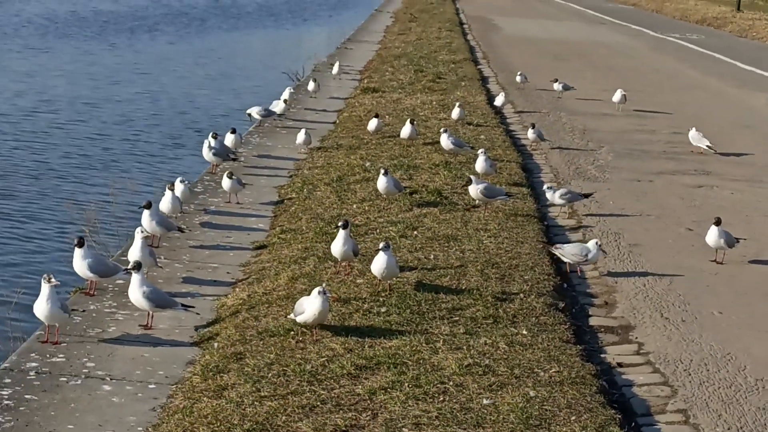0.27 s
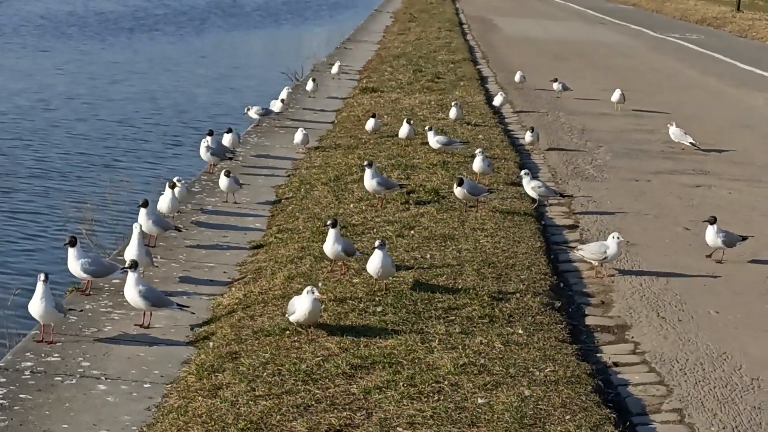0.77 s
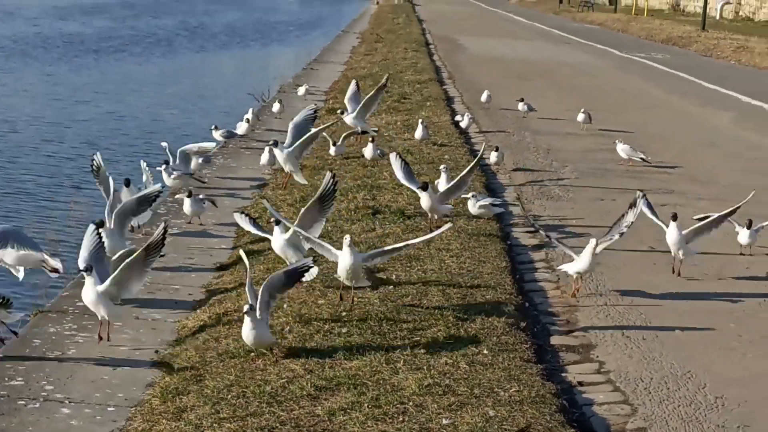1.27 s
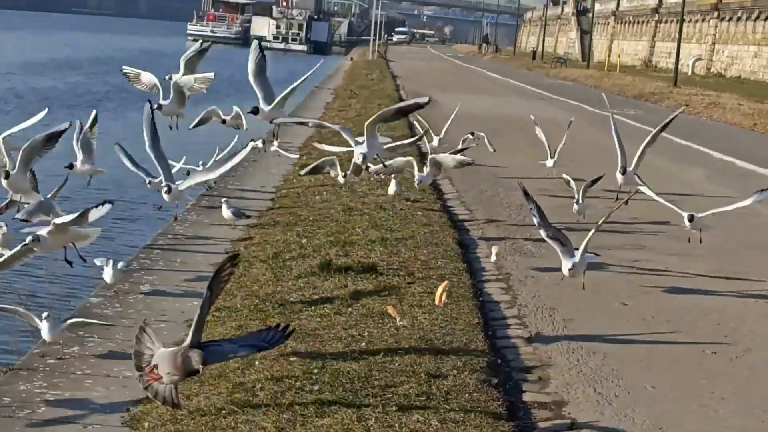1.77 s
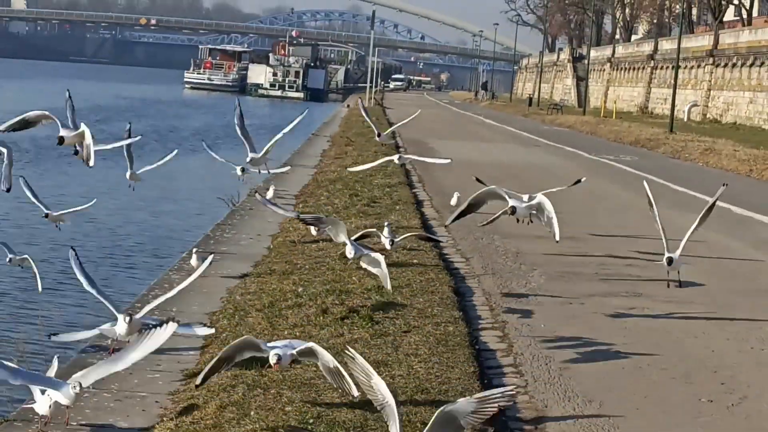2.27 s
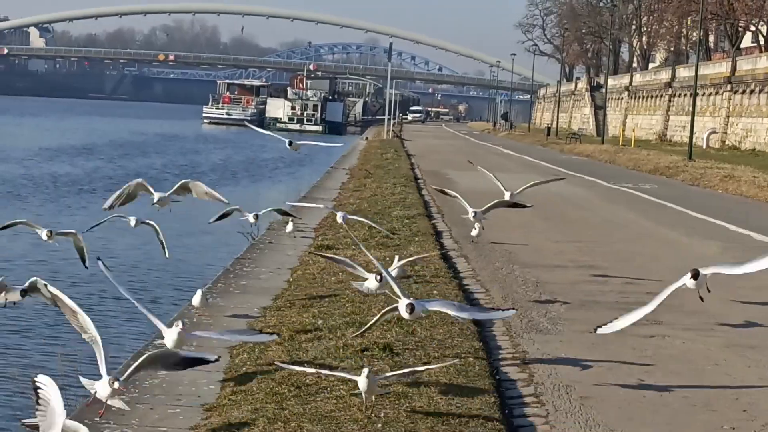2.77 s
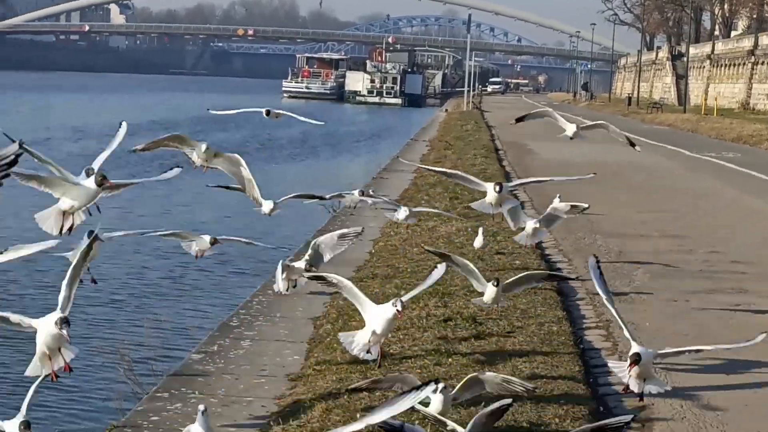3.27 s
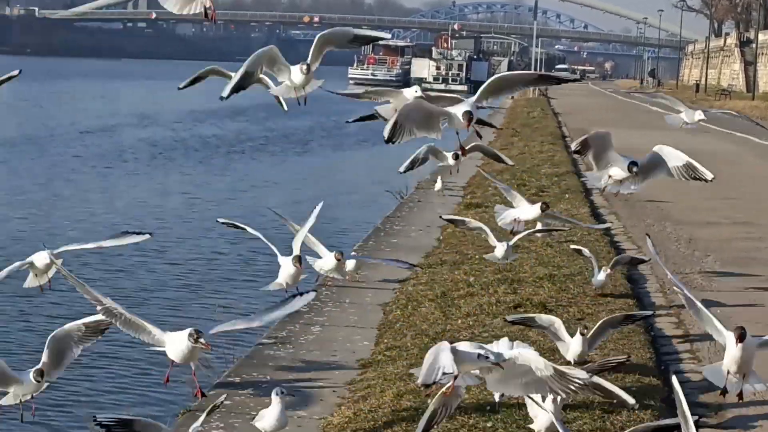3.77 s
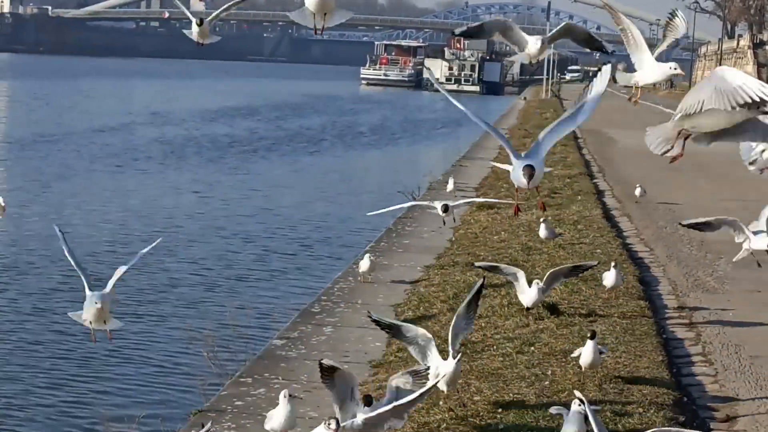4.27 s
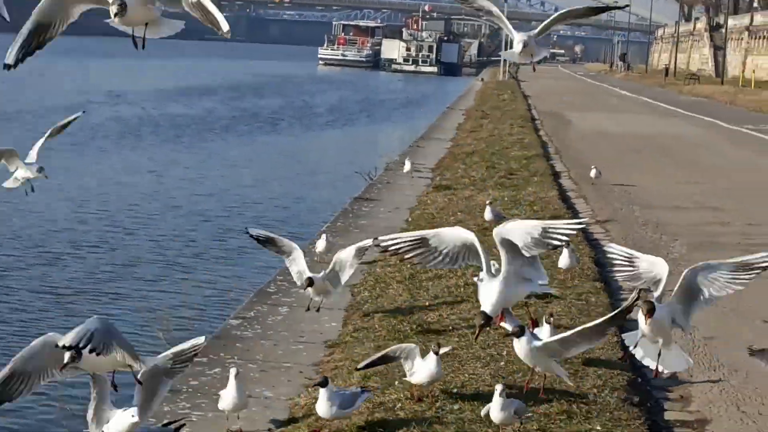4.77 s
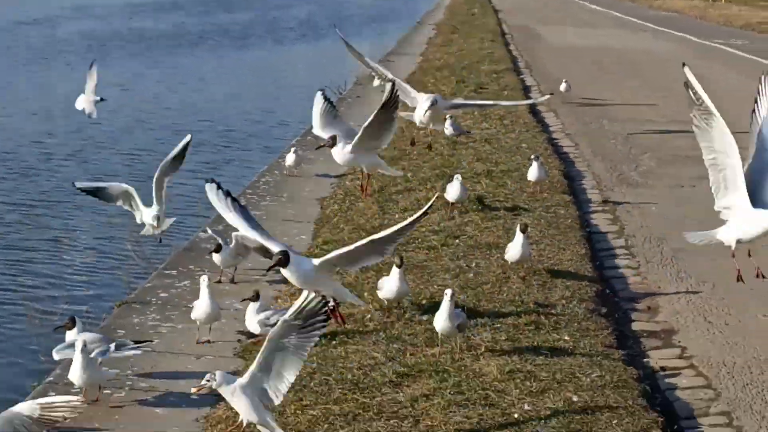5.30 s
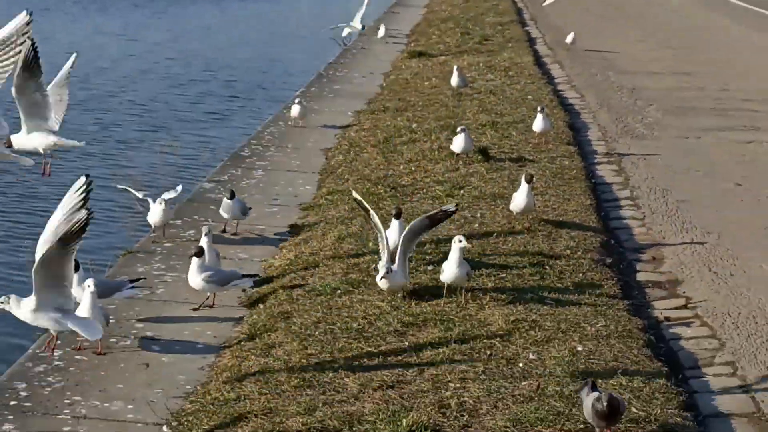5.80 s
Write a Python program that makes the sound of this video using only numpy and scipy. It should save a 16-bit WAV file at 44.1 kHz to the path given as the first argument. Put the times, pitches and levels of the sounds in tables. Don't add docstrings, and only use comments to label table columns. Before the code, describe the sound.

An open riverside path with faint far traffic hum and a soft wing thump. At about one and a half seconds a flock of gulls takes off: low flutters, then hoarse, nasal, rattling squawks overlapping, mostly to the left. The squabble stays dense for over two seconds, thins to a few single squawks, then falls back to quiet. Handheld phone, stereo, calls fairly close with a short outdoor scatter.

```python
import sys
import numpy as np
from scipy import signal
from scipy.fft import rfft, irfft, next_fast_len
from scipy.io import wavfile
from scipy.ndimage import uniform_filter1d, map_coordinates

SR = 44100
rng = np.random.default_rng(int(sys.argv[2]) if len(sys.argv) > 2 else 0)


def ratio_of_db(decibels):
    return 10 ** (np.asarray(decibels, float) / 20)


def dump_mix(stems):
    frames = np.atleast_2d(stems).T
    limited = np.clip(frames, -1, 1)
    pcm = np.round(limited * 32767).astype(np.int16)
    wavfile.write(sys.argv[1], SR, pcm)


N = 266364


def flock():
    # peak time, rise and fall in seconds, peak level in dB,
    # peak pitch in Hz.
    hoarse_bird = [
        (2.09, .06, .035, -19, 852),
        (2.14, 0.032, 0.043, -24.5, 876),
        (2.186, 0.035, 0.048, -19, 875),
        (2.243, 0.044, 0.028, -24.5, 859),
        (3.198, 0.019, 0.043, -32.5, 830),
    ]
    raspy_bird = [
        (1.712, 0.048, 0.052, -25.5, 1000),
        (1.964, 0.051, 0.028, -26, 1002),
        (3.76, 0.04, 0.053, -33, 870),
        (3.843, 0.053, 0.056, -22.5, 1010),
        (2.535, .04, .04, -24.5, 1020),
        (2.028, .012, 0.024, -34.5, 1020),
        (3.225, 0.033, .03, -34.5, 830),
        (4.326, .025, 0.0347, -37.5, 1050),
        (4.295, 0.038, 0.02, -37, 882),
    ]
    shrill_bird = [
        (3.27, .038, 0.067, -20.5, 989),
        (3.468, .038, 0.039, -17.5, 1020),
        (3.551, 0.046, 0.039, -29.5, 1039),
        (3.592, 0.026, 0.025, -23.5, 1284),
        (3.902, .04, .035, -25.5, 1078),
        (3.952, 0.044, 0.033, -20.5, 1075),
        (4.028, 0.04, 0.051, -20.5, 1090),
    ]
    rattling_bird = [
        (3.139, 0.045, 0.042, -27.5, 991),
        (3.375, 0.049, 0.047, -21.5, 1025),
        (3.686, .05, 0.047, -20, 1132),
        (4.197, 0.055, 0.045, -22.5, 1076),
    ]
    distant_bird = [
        (3.085, 0.038, .04, -40, 1100),
        (3.63, .03, .03, -42, 875),
        (4.1, .05, 0.057, -40, 1050),
        (4.255, 0.031, .03, -44.5, 948),
        (4.675, .035, 0.023, -39, 927),
        (4.994, 0.058, 0.022, -46, 970),
        (5.76, .02, 0.028, -47, 1206),
    ]
    low_bird = [
        (4.845, .036, 0.043, -23, 890),
        (4.5, 0.056, 0.048, -38, 520),
        (5.145, 0.041, 0.038, -51.5, 880),
    ]
    throaty_bird = [
        (4.516, 0.043, 0.044, -23, 979),
        (4.565, 0.041, 0.033, -31, 902),
        (5.205, .03, .025, -50, 854),
    ]
    # time in seconds, level in dB, pitch in Hz.
    cries = [
        [(2.31, -49, 935), (2.338, -26.5, 948), (2.36, -21.5, 1052), (2.395, -20.5, 1174), (2.45, -19, 1167),
         (2.49, -18, 1241), (2.52, -23.5, 1193), (2.56, -35, 1055)],
        [(2.55, -40, 901), (2.6, -34, 828), (2.66, -31, 867), (2.7, -34, 874), (2.74, -29.5, 1145),
         (2.774, -41, 917), (2.79, -68, 820)],
        [(2.825, -47, 834), (2.85, -32, 900), (2.9, -30, 1082), (2.925, -24, 1172), (2.96, -27.5, 1146),
         (2.985, -32, 1022), (3.038, -34, 942), (3.06, -58, 890)],
        [(1.68, -53, 951.6), (1.72, -36, 1023), (1.78, -37, 960), (1.86, -33.5, 932), (1.92, -41, 863.5),
         (2.03, -31.5, 1039), (2.2, -34.5, 908), (2.29, -43.5, 864)],
        [(1.69, -61, 1104), (1.73, -39, 1067), (1.8, -37.5, 1132), (1.86, -38, 1090), (1.91, -38, 1060),
         (2.0, -38, 920), (2.05, -60, 880)],
    ]
    asides = [
        [(1.628, -51, 714), (1.64, -43, 782), (1.65, -39.5, 812), (1.66, -41, 755), (1.668, -41, 706)],
        [(5.455, -53, 845), (5.482, -41.5, 881), (5.5, -36, 936), (5.535, -35.5, 956), (5.555, -37, 832),
         (5.6, -38, 865), (5.645, -40.5, 834), (5.665, -48.5, 824), (5.71, -54.5, 800)],
        [(1.395, -52.5, 903), (1.438, -38, 933), (1.468, -33.5, 942), (1.482, -49, 934)],
    ]
    # rattle in Hz, left-right difference in dB, beak resonance in Hz at 1 kHz pitch,
    # low band in dB, bright band in dB.
    voices = [(68, 9.5, 2700, -17, -13), (70.07, 9, 3130, -7, -12.5), (69.9, 9.5, 3310, -12, -16),
              (74.2, 8.5, 3470, -7, -11.5), (69.9, 11, 3160, -5, -7.5), (72.1, 8, 3660, -6.5, -16.5),
              (72.5, 8, 3300, -3.5, -16), (65.2, 8.5, 3150, -17, -7.5), (72.8, 9, 3400, -8, -10.5),
              (66.4, 10, 3240, -9.5, -9), (62.23, 1.5, 3000, 0.5, -14), (59.7, -3, 2200, -31, -0.9),
              (60, 11, 3000, -7, -18), (67.7, 5.5, 3520, -3, -14.5), (69.45, 8, 2800, -12, -23)]
    grain = [(.8, .45), (.85, .57), (.57, .78), (.58, .82), (.65, .6), (.55, .9), (.55, .85), (.55, .98),
             (.85, .7), (.6, .85), (.42, .75), (.52, .95), (.15, 0), (.45, .65), (.85, .5)]
    breath = [-1.5, 0, 1.5, 3, -1.5, 2.5, 2, 8, 4.5, 6, -4, 8.5, -2, -12, -6.5]
    beak_per_hz = 0.97
    port_lag = 2

    squawkers = (hoarse_bird, raspy_bird, shrill_bird, rattling_bird, distant_bird, low_bird, throaty_bird)
    birds = [[shaped(*row) for row in bird] for bird in squawkers]
    birds += [[cry] for cry in cries + asides]
    out = np.zeros((2, N))
    for calls, texture, breath_db, voice in zip(birds, grain, breath, voices):
        rattle_hz, lean_db, beak_hz, *bands_db = voice
        for rows in calls:
            rise_hz = beak_per_hz * (np.max(rows, axis=0)[2] - 1000)
            call = squawk(rows, *texture, rattle_hz, beak_hz + rise_hz, *bands_db, breath_db)
            direct = panned(call, lean_db)
            direct[1] = np.roll(direct[1], rng.integers(-port_lag, port_lag))
            heard = panned(bank(call), 0.72 * lean_db)
            add(heard, direct, 0)
            level = np.linalg.norm(call) / np.linalg.norm(heard.mean(axis=0))
            add(out, heard * level, rows[0][0])
    # (Hz, dB).
    far_port = [(800, 5.5), (2700, -2), (4500, -2), (6400, 16.0), (7800, 8), (9500, -10)]
    return filtered(out, lambda hz: [hz ** 0, ratio_of_db(along(far_port, hz))])


def shaped(peak_s, rise_s, fall_s, peak_db, peak_hz):
    edge_db, roundness = 18, 1.72
    slack_hz, slack_share, bend = 800, .85, 1.8
    u = np.linspace(-1, 1, 13)
    s = peak_s + u * np.where(u < 0, abs(rise_s), abs(fall_s))
    sag_hz = slack_share * (peak_hz - min(slack_hz, peak_hz)) * abs(u) ** bend
    return np.transpose([s, peak_db - edge_db * abs(u) ** roundness, peak_hz - sag_hz])


def squawk(rows, hoarse, depth, rattle_hz, beak_hz, low_db, bright_db, breath_db):
    # frequency in Hz, gain in dB.
    throat = [(260, -43), (450, -3.5), (633, -1), (815, -14.5), (931, -16), (1370, 4), (1930, 7.5),
              (3140, -0.5), (3810, -4.5), (4690, -13), (5360, -25), (6040, -29), (8010, -42.5),
              (12100, -31.5), (15600, -40)]
    s, *cols = np.transpose(rows)
    t = np.arange(s[0], s[-1] + 0.0016, 1 / SR)
    level_db, pitch_hz = (np.interp(t, s, c) for c in cols)

    slack = np.clip((level_db.max() - level_db) / 14, 0, 1)
    hoarse = hoarse * (.75 + .5 * slack)
    low_db = np.minimum(low_db, -.4) * (1 - 0.7 * slack)

    beats = np.cumsum(rattle_hz * (1 + .08 * wobble(len(t), 40))) / SR
    beats = beats - beats[level_db.argmax()] + 40.4
    beat = beats % 1
    chance = rng.standard_normal((80, 3))[beats.astype(int)].T
    opening = np.clip(beat / .2, 0, 1)
    closing = np.clip((.92 - beat) / .18, 0, 1)
    puff = opening * (1 - .15 * beat) * closing
    gate = (1 - depth + depth * puff ** 1.5) * ratio_of_db(2.2 * depth * wobble(len(t), 130))

    arch = .07 * depth * (np.sin(np.pi * beat) - .7)
    jitter = hoarse * (.07 * wobble(len(t), 600) + .04 * wobble(len(t), 120) + .04 * chance[0])
    k = np.arange(1, 13)[:, None]
    membrane = lambda hz: np.cos(k * 2 * np.pi * np.cumsum(hz) / SR + 0.303 * k * k).sum(axis=0)
    first = membrane(pitch_hz * (1 + arch + jitter))
    second = membrane(pitch_hz * (.87 + .05 * chance[1] + arch - jitter))
    breath = rng.standard_normal(len(t))
    source = unit(first) + 1.5 * hoarse ** 2 * (1 + .4 * chance[2]) * unit(second)
    source = source + 1.2 * hoarse ** 2 * breath
    source = source / np.sqrt(1 + 4 * hoarse ** 4)

    span_hz = np.ptp(pitch_hz) + 1
    edge = lambda hz, at_hz: 1 / (1 + (hz / at_hz) ** 14)
    peak = lambda hz, at_hz, width_hz: 1 / (1 + ((hz - at_hz) / width_hz) ** 2)
    beak = lambda hz, at_hz: (edge(hz, 4020) - edge(hz, 2407)) * (0.21 + peak(hz, at_hz, 450))
    hiss = lambda hz: (1 - edge(hz, 7950.0)) * (1 + 0.62 * peak(hz, 12200, 1200))
    zones = lambda hz: ratio_of_db(along(throat, hz)) * [
        edge(hz, 2460), beak(hz, beak_hz), beak(hz, beak_hz - 0.85 * span_hz),
        edge(hz, 8300) - edge(hz, 4207), hiss(hz)]
    low, wide, narrow, bright, air = (unit(zone) for zone in filtered(unit(gate) * source, zones))

    gape = np.pi / 2 * (pitch_hz - pitch_hz.min()) / span_hz
    middle = unit(np.sin(gape) ** 2 * wide + np.cos(gape) ** 2 * narrow)
    rest = np.sqrt(np.clip(1 - ratio_of_db(2 * low_db) - ratio_of_db(2 * bright_db), .03, 1))
    air_db = breath_db - 33.0 - 0.32 * level_db.max()
    voice = ratio_of_db(low_db) * low + rest * middle + ratio_of_db(bright_db) * bright + ratio_of_db(air_db) * air
    ends = np.clip(np.minimum((t - t[0]) / 0.0092, (t[-1] - t) / 0.0022), 0, 1)
    return ratio_of_db(level_db) * ends * voice


def bank(x):
    # frequency in Hz, 60 dB decay time in seconds.
    decay = [(300, 0.11), (2500, 0.21), (6000, 0.16), (14000, 0.012)]
    hz, t, z = signal.stft(rng.standard_normal((2, SR // 8)), SR, nperseg=256)
    tail = signal.istft(z * ratio_of_db(-60 * t / along(decay, hz)[:, None]), SR, nperseg=256)[1]
    near = rng.standard_normal(tail.shape) * ratio_of_db(-60 * np.arange(tail.shape[1]) / SR / .007)
    answer = ratio_of_db(-4) * unit(near) + ratio_of_db(-17) * unit(tail)
    return signal.fftconvolve(x[None], answer / np.sqrt(tail.shape[1]), axes=1)


def wing_thumps():
    # time in seconds, peak level in dB, frequency in Hz.
    flaps = [(0.303, -26.5, 118), (1.6, -26.5, 121), (1.63, -27, 198), (1.719, -27, 148), (1.744, -30, 188),
             (1.768, -37, 137), (1.791, -33, 177), (1.818, -28, 105), (1.872, -26.5, 159),
             (1.941, -30, 143), (1.99, -34.5, 144), (2.081, -30, 129), (3.891, -30.5, 92.5)]
    out = np.zeros((2, N))
    t = np.arange(0, .04, 1 / SR)
    for s, db, hz in flaps:
        phase = rng.normal(0, 1.1, (2, 1))
        thump = np.sin(np.pi * t / .04) ** 2 * np.sin(2 * np.pi * hz * t + phase)
        add(out, ratio_of_db(db) * thump, s - .006)
    return out


def feather_rustles():
    # start and length in seconds, centre and width in Hz, level in dB.
    rustles = [
        (0.748, 0.099, 6100, 2500, -58),
        (.83, 0.023, 6460, 1500, -54.5),
        (0.908, 0.032, 11000, 8000, -60),
        (5.25, 0.0087, 5000, 9000, -48.5),
        (4.884, 0.029, 7040, 1200, -58),
        (5.637, 0.018, 8700, 9200, -55),
        (5.726, 0.01, 9000, 8000, -57),
        (5.99, .008, 11500, 5000, -62),
    ]
    out = np.zeros((2, N))
    for s, length, centre_hz, width_hz, db in rustles:
        n = round(length * SR)
        band = lambda hz: np.exp(-((hz - centre_hz) / width_hz * 2) ** 2)
        noise = unit(filtered(rng.standard_normal((2, 4410)), band))
        add(out, ratio_of_db(db) * np.hanning(n) * noise[:, :n], s)
    return out


def peeps_and_whistles():
    # start and length in seconds, start and end frequency in Hz, level in dB.
    glides = [(0.358, .05, 4120, 4080, -66), (0.628, .09, 4100, 4080, -67), (.86, 0.098, 4080, 4120, -64),
              (1.176, 0.058, 3940, 4170, -61), (1.471, 0.11, 4060, 4100, -63), (4.41, .06, 4100, 4180, -71),
              (4.7, 0.046, 4150, 4120, -68), (5.06, 0.067, 5200, 4900, -68), (5.222, .09, 4100, 4080, -62),
              (5.36, 0.036, 4950, 4950, -64.5), (5.77, 0.054, 4050, 4120, -58),
              (5.845, 0.059, 5170, 4950, -70), (2.491, 0.056, 559, 714, -42.5),
              (2.514, 0.096, 711, 692, -42.5), (3.768, 0.12, 601.5, 643, -48),
              (3.934, 0.047, 685, 710, -47), (4.029, .14, 713, 570, -46)]
    out = np.zeros((2, N))
    for s, length, start_hz, end_hz, db in glides:
        n = round(length * SR)
        glide_hz = np.linspace(start_hz, end_hz, n) * (1 + 0.0037 * wobble(n, 165))
        shape = np.hanning(n) ** 0.46 * ratio_of_db(2.0 * wobble(n, 87))
        tone = np.sin(2 * np.pi * np.cumsum(glide_hz) / SR)
        add(out, panned(ratio_of_db(db + 1.5) * shape * tone, 2.9), s)
    return out


def stirred_air():
    # frequency in Hz, level in dB.
    wash = [(250, -9.5), (450, 1), (700, 3), (1100, -9.5), (1800, -32)]
    feather_hiss = [(2240, -34), (3800, -26), (4150, 7.5), (4480, -5), (6700, -4), (8050, -17),
                    (10800, -14.5), (12000, 1), (15600, -17)]
    # time in seconds, hiss level in dB.
    wings = [(0, -81), (.55, -79), (.7, -72.5), (1.4, -63), (1.9, -63.5), (2.5, -61.5), (4.1, -57.5),
             (4.4, -64), (6.04, -69.5)]
    (hiss_db,) = curves(wings)
    wash_db = -47 + 0.24 * (hiss_db - hiss_db.max())
    stir = wobble(N, 11.0)
    return (ratio_of_db(wash_db - 4 + 0.5 * stir) * rush(wash, patchy_db=1.8)
            + ratio_of_db(hiss_db + .8 * stir) * rush(feather_hiss, patchy_db=1.5))


def far_traffic():
    # frequency in Hz, level in dB.
    rumble = [(13, -73), (22, -50), (38, -61), (56, -9.5), (103, -1.5), (375, -13.5), (500, -23),
              (650, -22.5), (1100, -120)]
    traffic = [(530, -21), (900, -4.5), (3330, -11), (3750, -21.5), (4220, -23.5), (4840, -26), (6480, -26),
               (8000, -48), (10400, -78), (17600, -120)]
    # time in seconds, level in dB.
    clamour = [(0, -53.5), (1.4, -53), (2.25, -48), (2.6, -43.5), (4, -43), (4.4, -52), (6.04, -55)]
    (traffic_db,) = curves(clamour)
    return (ratio_of_db(-43 + 0.5 * wobble(N, 6.6)) * rush(rumble, patchy_db=0.0)
            + ratio_of_db(traffic_db + .6 * wobble(N, 4)) * rush(traffic, patchy_db=.6))


def rush(spectrum, patchy_db):
    # frequency in Hz, left-right correlation from -1 to 1.
    likeness = [(60, 0.65), (180, 0.92), (350, 0.79), (700, 0.35), (1650, -0.09), (15000, -0.13)]
    # frequency in Hz, left-right difference in dB.
    tilt = [(60, -1), (950, 1.5), (15000, 5)]
    z = signal.stft(rng.standard_normal((2, N)), nperseg=512)[2]
    field = uniform_filter1d(rng.standard_normal(z.shape[1:]), size=6, axis=0)
    field = uniform_filter1d(field, size=12, axis=1)
    pair = signal.istft(z * ratio_of_db(patchy_db * unit(field)), nperseg=512)[1][:, :N]
    turn = lambda hz: np.arccos(np.clip(along(likeness, hz), -1, 1)) / 2
    mid, side = filtered(pair, lambda hz: ratio_of_db(along(spectrum, hz)) * [np.cos(turn(hz)), np.sin(turn(hz))])
    lean = lambda hz: ratio_of_db(np.outer([.5, -.5], along(tilt, hz)))
    both = filtered(np.array([mid + side, mid - side]), lean)
    return both / np.std(both.mean(axis=0))


def unit(x):
    return x / np.sqrt(np.mean(x ** 2) + 1e-20)


def along(points, hz):
    f, v = np.transpose(points)
    return np.interp(np.log(hz + 1), np.log(f + 1), v)


def curves(rows):
    s, *cols = np.transpose(rows)
    return [np.interp(np.arange(N) / SR, s, c) for c in cols]


def wobble(n, rate_hz):
    knots = rng.standard_normal(int(n * 1.1 * rate_hz / SR) + 9)
    return map_coordinates(knots, [np.arange(n) * rate_hz / SR])


def filtered(x, response):
    m = next_fast_len(x.shape[-1] + 4096)
    return irfft(rfft(x, m) * response(np.fft.rfftfreq(m, 1 / SR)), m)[..., :x.shape[-1]]


def panned(x, lean_db):
    pair = ratio_of_db(np.array([[lean_db / 2], [-lean_db / 2]]))
    return x * pair / pair.mean()


def add(out, x, s):
    part = out[:, round(s * SR):][:, :x.shape[1]]
    part += x[:, :part.shape[1]]


def scene():
    return (flock() + wing_thumps() + feather_rustles() + peeps_and_whistles()
            + stirred_air() + far_traffic())


def band_limit(x):
    return signal.sosfilt(signal.butter(12, 15760, fs=SR, output="sos"), x)


def record(dry):
    rounded = dry / (1 + np.abs(dry / .85) ** 4) ** .25
    return band_limit(rounded)


dry = scene()
out = record(dry)
dump_mix(out)
```